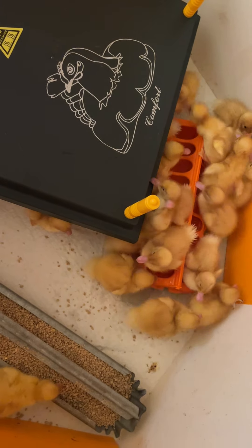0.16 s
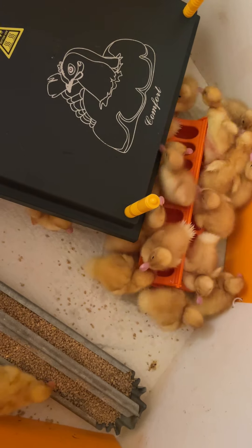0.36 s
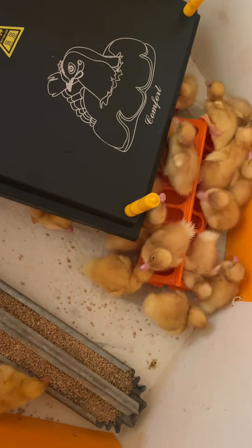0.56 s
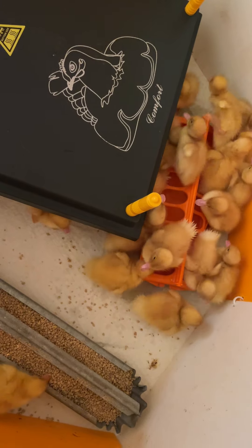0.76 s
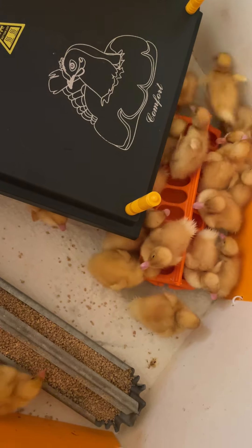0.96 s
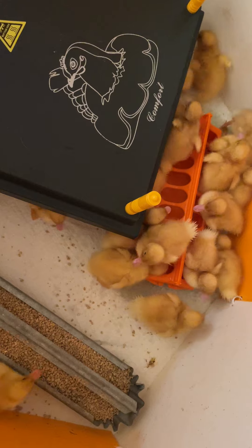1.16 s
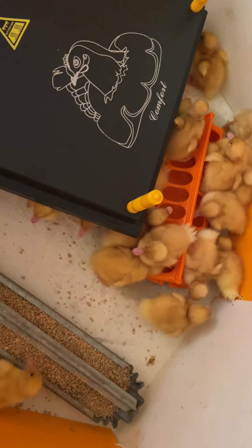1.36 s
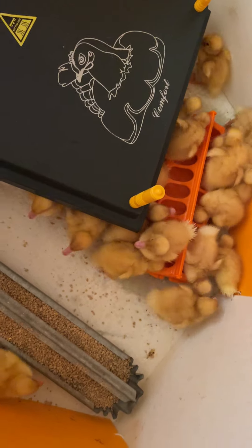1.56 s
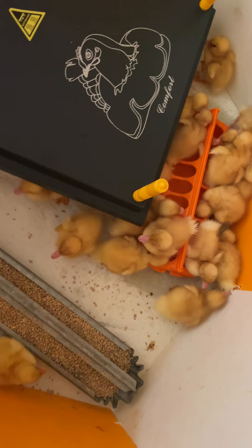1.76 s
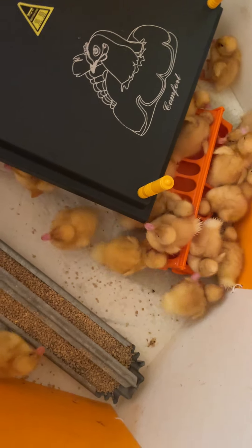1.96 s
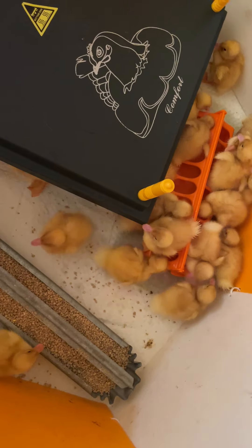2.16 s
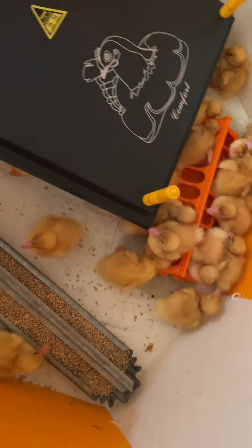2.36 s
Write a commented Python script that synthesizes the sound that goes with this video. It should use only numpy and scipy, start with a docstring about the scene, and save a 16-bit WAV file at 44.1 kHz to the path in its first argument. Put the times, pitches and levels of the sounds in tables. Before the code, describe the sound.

A crowd of ducklings gives quick, sliding, overlapping peeps, thinning out partway through, while feet shuffle and bills tick on a plastic trough; close phone microphone in a small, slightly echoing indoor pen.

```python
"""Ducklings huddle and peep in an indoor brooder under a phone: gliding sine whistles with a weak octave.
Bills tick on a plastic trough as bursts of decaying partials; feet thump as short tones with noise slaps.
Something scrapes once and a low drone swells briefly, both noise through resonances.
The pen echoes by a decaying noise tail, over stirring room noise, a faint hum and a low rumble."""
import sys
import numpy as np
from scipy import signal
from scipy.fft import rfft, irfft, next_fast_len
from scipy.io import wavfile
from scipy.ndimage import uniform_filter1d, map_coordinates

SR = 44100
rng = np.random.default_rng(int(sys.argv[2]) if len(sys.argv) > 2 else 0)


def boost_factor(decibels):
    """Convert a level in decibels to a linear amplitude factor."""
    exponent = np.asarray(decibels, float) / 20
    return 10 ** exponent


def transcribe(u):
    """Save the signal u as a 16-bit wav file named by the first command-line argument.

    u: samples, shape (n,) or (channels, n), limited to [-1, 1]; the rate is SR.
    q: integer samples, one column per channel.
    """
    v = np.clip(np.atleast_2d(u).T, -1, 1)
    q = np.round(v * 32767).astype(np.int16)
    wavfile.write(sys.argv[1], SR, q)


N = 105575
T = np.arange(N) / SR

# Phase between the two microphone ports: pitch_hz [Hz], left_lead_rad [radians]
PORT_LEAD = [(900, -.3), (2580, .4), (4050, 1.4), (5600, 6.6), (9200, 9.2), (12800, 11.2)]


def unit(x):
    """Scale to rms 1."""
    return x / np.sqrt(np.mean(x ** 2) + 1e-20)


def along(points, hz):
    """Interpolate (Hz, value) points on a log frequency axis."""
    point_hz, value = np.transpose(points)
    return np.interp(np.log(hz + 1), np.log(point_hz + 1), value)


def wobble(rate, size=N):
    """A smooth random curve with rate knots a second, at most 200."""
    knots = rng.standard_normal(int(size * 200 / SR) + 4)
    return map_coordinates(knots, [np.arange(size) * min(rate, 200) / SR])


def filtered(x, response):
    """Multiply the spectrum of x by a complex response of frequency."""
    m = next_fast_len(N + SR // 2)
    return irfft(rfft(x, m) * response(np.fft.rfftfreq(m, 1 / SR)), m)[..., :N]


def resonances(rows):
    """Causal response of (Hz, width Hz, dB) resonances, summed with alternating sign."""
    def response(f):
        total = 0
        for k, (center, width, db) in enumerate(rows):
            total = total + (-1) ** k * boost_factor(db) * 1j * f * width / (center ** 2 - f ** 2 + 1j * f * width)
        return total
    return response


def add(track, s, x):
    """Mix x into track at s seconds."""
    part = track[..., max(round(s * SR), 0):][..., :x.shape[-1]]
    part += x[..., :part.shape[-1]]


def whistle(rows):
    """A husky sine with a weak octave, gliding through its points; returns start and stereo sound."""
    glide_s, fade_s = .006, .004
    flutter_db, flutter_hz = 2.8, 110
    waver, waver_hz = .004, 128.4  # waver is a share of the pitch
    husk, husk_s = .18, .0015  # breathy blur around the whistle, and its grain
    right_db = 1.5  # right channel over left
    # The octave's strength: overtone_hz [Hz], level_db [dB over the fundamental]
    overtone = [(6000, -22), (9200, -16), (10500, -45)]

    s, hz, db = np.transpose(rows)
    start = max(s[0] - fade_s, 0)
    t = np.arange(start, s[-1] + fade_s, 1 / SR)

    def smooth(values):
        return uniform_filter1d(np.interp(t, s, values), int(glide_s * SR) + 1, mode="nearest")

    pitch = smooth(hz) * (1 + waver * wobble(waver_hz, len(t)))
    edge = np.clip(np.minimum((t - s[0]) / fade_s + 1, (s[-1] - t) / fade_s + 1), 0, 1)
    level = smooth(db) + flutter_db * wobble(flutter_hz, len(t))
    breath = np.convolve(rng.standard_normal(len(t)), np.hanning(int(husk_s * SR * 2)), "same")
    gain = np.sqrt(2) * edge * boost_factor(level) * (1 + husk * unit(breath))  # root 2: levels are rms
    phase = 2 * np.pi * np.cumsum(pitch) / SR + np.outer([.5, -.5], along(PORT_LEAD, pitch))
    tone = np.sin(phase) + boost_factor(along(overtone, 2 * pitch)) * np.sin(2 * phase)
    return start, gain * tone * boost_factor([[-right_db / 2], [right_db / 2]])


def ducklings():
    """Voices calling over each other: every whistled curve is placed at its moment."""
    # One curve of points per peep; the 7 kHz curve at 0.865 s is the octave of the 3.6 kHz peep:
    # time_s [s], pitch_hz [Hz], level_db [dB rms before flutter and balance]
    curves = [
        [(0.0, 4983, -36), (0.04, 5034, -37), (0.058, 5030, -55)],
        [(0.0, 3020, -39.5), (0.01, 3470, -53), (0.025, 3750, -51)],
        [(0.005, 4660, -49), (0.035, 3880, -50), (0.065, 4280, -40), (0.085, 3750, -46), (0.145, 3170, -42.5),
         (0.16, 2490, -58)],
        [(0.123, 2254, -46.5), (0.14, 3740, -40)],
        [(0.165, 4140, -42), (0.205, 3600, -50.5), (0.218, 2820, -45)],
        [(0.235, 4340, -57), (0.272, 3703, -48.5), (0.295, 3190, -33), (0.325, 3266, -41.5), (0.35, 2800, -47)],
        [(0.39, 4550, -45), (0.42, 4020, -55), (0.465, 4340, -38), (0.49, 3650, -49.5), (0.535, 3290, -50),
         (0.553, 2840, -57.5)],
        [(0.375, 6070, -50), (0.402, 4800, -46)],
        [(0.415, 5250, -62), (0.435, 5290, -40.5), (0.455, 5395, -32.5), (0.472, 5195, -45), (0.508, 5570, -47)],
        [(0.68, 4470, -59), (0.705, 4220, -51.5), (0.725, 3800, -49)],
        [(0.735, 2410, -52), (0.745, 3470, -44)],
        [(0.755, 4770, -48), (0.81, 3910, -42.5)],
        [(0.755, 3150, -58), (0.785, 2060, -59.5)],
        [(0.815, 5000, -52), (0.83, 5500, -59), (0.838, 6370, -46)],
        [(0.865, 7160, -55), (0.89, 7300, -61), (0.903, 6600, -57)],
        [(0.706, 2103, -51), (0.722, 3410, -49), (0.745, 3640, -44)],
        [(0.742, 6470, -43.5), (0.775, 4700, -57)],
        [(0.757, 3930, -50), (0.79, 3757, -35.5), (0.81, 3253, -32.5), (0.835, 3323, -43), (0.858, 2514, -53)],
        [(0.822, 3925, -42), (0.85, 3654, -39), (0.88, 3577, -52), (0.905, 3360, -51), (0.975, 3466, -55.5)],
        [(0.86, 5400, -42), (0.89, 5406, -36), (0.91, 4860, -34), (0.935, 5170, -50), (0.96, 6170, -51)],
        [(0.925, 3340, -40), (0.938, 3800, -36), (0.947, 4730, -53)],
        [(1.048, 2255, -71), (1.062, 3370, -40.5), (1.085, 4075, -42.5), (1.13, 4240, -39), (1.155, 3700, -36),
         (1.172, 2340, -60.5)],
        [(1.105, 3576, -41), (1.15, 3647, -36), (1.18, 3530, -42), (1.203, 3427, -43), (1.22, 2070, -64)],
        [(1.133, 4820, -47), (1.145, 5660, -51), (1.172, 5600, -48)],
        [(1.232, 2730, -59), (1.25, 3725, -40.5), (1.27, 4027, -58), (1.288, 2800, -53)],
        [(1.335, 2180, -54.5), (1.35, 3500, -47.5), (1.365, 4300, -61)],
        [(1.355, 5000, -67), (1.372, 5460, -67), (1.39, 4730, -90)],
        [(1.335, 4290, -53.5), (1.37, 3300, -62), (1.4, 2620, -69)],
        [(1.465, 3510, -63), (1.49, 4760, -43), (1.525, 3360, -44.5), (1.54, 2600, -52)],
        [(1.66, 5600, -60), (1.685, 5780, -54.5), (1.712, 5150, -64), (1.728, 5500, -56)],
        [(1.73, 2340, -62), (1.75, 5260, -50.5), (1.775, 5450, -62), (1.79, 4300, -48)],
        [(1.75, 4190, -60), (1.78, 3880, -55.5), (1.8, 3400, -47)],
        [(1.818, 2030, -58), (1.832, 3660, -43), (1.848, 4290, -41), (1.885, 3434, -35), (1.918, 3140, -46),
         (1.936, 2170, -60)],
        [(2.118, 3370, -57), (2.135, 4080, -42), (2.16, 4197, -33), (2.18, 3958, -41), (2.198, 4570, -44.5),
         (2.212, 3960, -66)],
        [(2.175, 5600, -47), (2.188, 5960, -50), (2.208, 5000, -53)],
        [(2.21, 5300, -58), (2.225, 6200, -61), (2.25, 5800, -64)],
        [(2.235, 2990, -55), (2.245, 3590, -39.5), (2.26, 3935, -49), (2.28, 3220, -66)],
        [(2.25, 4200, -40), (2.268, 4400, -55)],
        [(2.328, 2830, -63.5), (2.36, 4830, -38.5), (2.385, 4020, -56)],
        [(2.338, 5180, -50.5), (2.364, 6330, -47), (2.38, 4880, -56)],
    ]
    out = np.zeros((2, N))
    for rows in curves:
        add(out, *whistle(rows))
    return out


def pen(x):
    """The walls' answer: a noise tail dying by band; rows are the direct and the diffuse part."""
    # Decay of the echo: band_hz [Hz], t60_s [s]
    decay = [(300, 0.28), (3500, 0.32), (8000, 0.1)]
    hz, t, z = signal.stft(rng.standard_normal((2, SR // 2)), SR, nperseg=256)
    dying = z * boost_factor(-60 * t / along(decay, hz)[:, None])
    tail = signal.istft(dying, SR, nperseg=256)[1]
    delayed = np.pad(x, (200, 0))[None]  # 200 samples
    return signal.fftconvolve(delayed, tail / np.linalg.norm(tail[0]), axes=1)[:, :N]


def bustle(s):
    """Activity in dB, a slow curve that moves the shuffling feet and the room noise together."""
    # How busy the feet and down are: time_s [s], activity_db [dB]
    activity = [(0, 3.5), (.48, 1), (.6, -3.5), (1, 1.5), (1.25, -2.5), (1.75, 3), (1.95, -5), (2.39, 2)]
    return np.interp(s, *np.transpose(activity))


def room_noise():
    """Shaped noise stirring with the bustle; rows are the direct and the diffuse part."""
    # Spectrum of the noise: band_hz [Hz], density_db [relative dB per Hz]
    spectrum = [(90, 8.5), (200, -3.5), (600, -11.5), (3500, -5.5), (7000, -6), (13200, -8), (14900, -44)]
    noise = filtered(rng.standard_normal((2, N)), lambda hz: boost_factor(along(spectrum, hz)))
    level = -57 + bustle(T) + 2.1 * wobble(18)
    return boost_factor(level) * noise / np.std(noise[0])


def hum():
    """A faint steady-pitched sine at 68.5 Hz whose level wanders a little."""
    return boost_factor(-60 + wobble(10.9)) * np.sin(2 * np.pi * 68.5 * T)


def rumble():
    """Noise passed twice through one low resonance at 55 Hz."""
    body = resonances([(55, 40, 0)])
    return boost_factor(-64.5) * unit(filtered(rng.standard_normal(N), lambda f: body(f) ** 2))


def feet():
    """Soft footfalls and random shuffling: a dull thump of a few cycles and a slap of noise."""
    # Footfalls: start_s [s], level_db [dB before the step gain], pitch_hz [nominal Hz]
    footfalls = [(0.061, -48, 860), (0.181, -43.5, 381), (0.235, -42.5, 605), (0.29, -39, 373),
                 (0.357, -41, 377), (0.437, -46.5, 302), (0.824, -45, 1240), (1.01, -43, 205),
                 (1.184, -51, 209), (1.357, -44, 249), (1.631, -36, 1090), (1.771, -47, 436),
                 (1.849, -36.5, 703), (1.861, -38, 371), (2.019, -46.5, 823), (2.099, -41.5, 730),
                 (2.161, -45, 2500), (2.25, -48.5, 490)]
    step_gain_db, attack_s = 7, 0.00064
    fall_cycles = 9  # cycles in which a thump partial falls 30 dB
    slap_db, slap_s = -5.5, 0.013  # starting level, and time to fall 30 dB
    shuffle_per_s, shuffle_db = 33, -61.5  # the softest, before bustle and step gain
    partials = [(0.983, 0.59), (1.895, 0.18)]  # (ratio to the nominal pitch, amplitude)

    steps = list(footfalls)
    for u, v, w in rng.random((int(shuffle_per_s * N / SR), 3)):
        s = u * N / SR
        steps.append((s, shuffle_db + 1.22 * bustle(s) + 10 * v, 230 * 5 ** w))

    out, t = np.zeros(N), np.arange(SR // 12) / SR
    attack = 1 - np.exp(-t / attack_s)
    for s, db, hz in steps:
        thump = 0
        for ratio, gain in partials:
            partial_hz = hz * ratio
            decay = boost_factor(-30 * t * partial_hz / fall_cycles)
            thump = thump + gain * decay * np.sin(2 * np.pi * partial_hz * t)
        dull_noise = uniform_filter1d(rng.standard_normal(len(t)), size=7) * 2
        slap = boost_factor(slap_db - 30 * t / slap_s) * dull_noise
        add(out, s, boost_factor(db + step_gain_db) * attack * (thump + slap))
    return out


def ticks():
    """Bills on the plastic trough, plus a random patter: a short ring and an equal quick rebound."""
    # Bill ticks: start_s [s], level_db [dB before the tick gain]
    bill_ticks = [(0.2086, -37.5), (0.285, -39), (0.5272, -26), (0.9537, -30), (1.0904, -32.5),
                  (1.4126, -20.5), (1.4721, -46), (1.5505, -27), (1.7085, -22.5), (2.0878, -33.5)]
    # Ringing modes of the trough: pitch_hz [mean Hz], level_db [mean dB], t60_s [s]
    trough = [(1100, -22, .007), (6000, -12, .004), (8300, -2, .003), (10300, 0, .003), (12800, 2, .003)]
    tick_gain_db, rebound_s, attack_s = -2, 0.0012, .00006
    patter_per_s, patter_db = 35, -62  # the softest, before the tick gain

    hits = list(bill_ticks)
    for u, v in rng.random((int(patter_per_s * N / SR), 2)):
        hits.append((u * N / SR, patter_db + 10 * v))

    out, t = np.zeros(N), np.arange(SR // 30) / SR
    attack = 1 - np.exp(-t / attack_s)
    for s, db in hits:
        ring = 0
        for hz, level, t60 in trough:
            decay = boost_factor(level + rng.normal(0, 2) - 60 * t / t60)
            ring = ring + decay * np.sin(2 * np.pi * hz * rng.normal(1, .04) * t)
        hit = boost_factor(db + tick_gain_db) * attack * ring
        add(out, s, hit)
        add(out, s + rebound_s, hit)
    return out


def rubbing(level, body, rough_db):
    """Uneven noise in a body's resonances under a level curve."""
    grain = rng.standard_normal(N) * boost_factor(rough_db * wobble(190))
    return unit(filtered(grain, resonances(body))) * boost_factor(np.interp(T, *np.transpose(level), -120, -120))


def drone():
    """A low drone swells briefly: rough noise in one broad resonance at 360 Hz."""
    # Level curve: time_s [s], level_db [dB]
    swell = [(.29, -59), (.5, -57)]
    return rubbing(swell, [(360, 280, 0)], rough_db=-6.0)


def scrape():
    """Something scrapes once: grainy noise rings the resonances of the scraped body."""
    # Level curve: time_s [s], level_db [dB]
    stroke = [(1.5, -63), (1.56, -46), (1.68, -57), (1.8, -66)]
    # Resonances of the scraped body: center_hz [Hz], width_hz [Hz], level_db [relative dB]
    scraped_body = [(910, 430, 0), (1800, 290, 2.5), (2730, 720, -0.5)]
    return rubbing(stroke, scraped_body, rough_db=3.5)


def ports(direct, diffuse):
    """The two microphone ports: a phase lead between them, and an opposed diffuse share in the middle band."""
    def turn(hz):
        return np.exp(.5j * np.outer([1, -1], along(PORT_LEAD, hz) * (hz > 300)))

    def middle_band(hz):
        return [[1], [-1]] * hz / (hz + 250 / 1j) / (1 + (hz / 6000) ** 4)

    return filtered(direct + filtered(diffuse, middle_band), turn)


def scene():
    """Everything at the two ports; the pen echoes the left channel of the birds and the other contacts."""
    birds = ducklings()
    things = feet() + ticks() + drone() + scrape()
    air = room_noise() + boost_factor(-8.5) * pen(birds[0] + things)
    return birds + ports(things + air[0], .6 * air[1]) + hum() + rumble()


def top_cut(x):
    """Nothing passes above the cut-off."""
    return signal.sosfilt(signal.butter(12, 16490, fs=SR, output="sos"), x)


def record(dry):
    """The phone's bass cut and treble roll-off."""
    low_cut_hz, top_hz = 34, 15800

    def band(hz):
        return hz ** 4 / (hz ** 4 + low_cut_hz ** 4) / (1 + (hz / top_hz) ** 20)

    mix = filtered(dry, band)
    return top_cut(mix)


dry = scene()
out = record(dry)
transcribe(out)
```